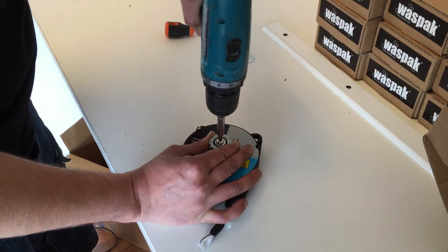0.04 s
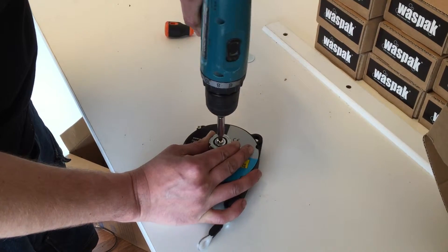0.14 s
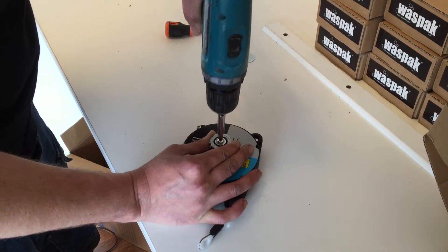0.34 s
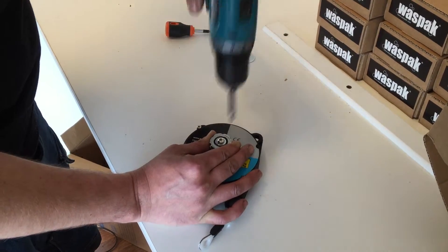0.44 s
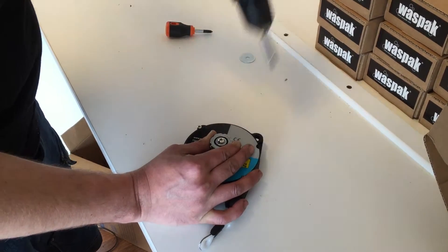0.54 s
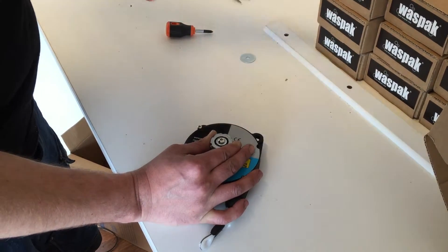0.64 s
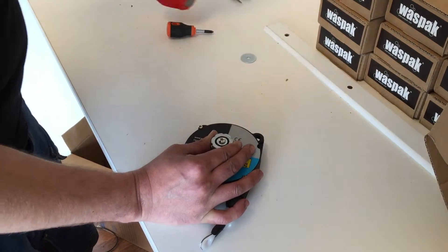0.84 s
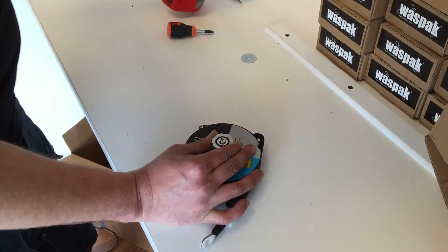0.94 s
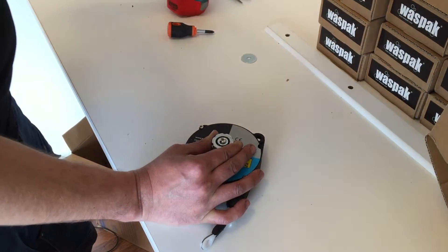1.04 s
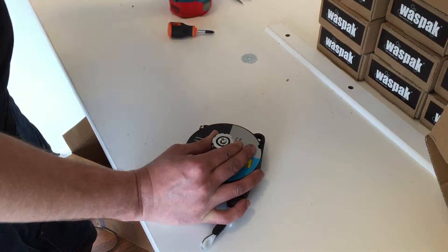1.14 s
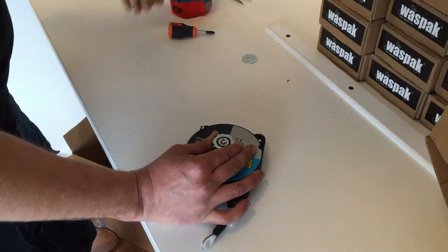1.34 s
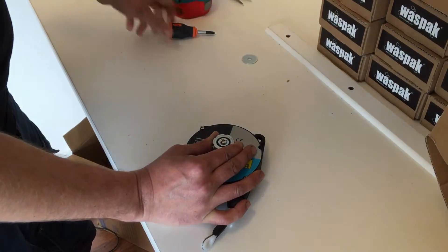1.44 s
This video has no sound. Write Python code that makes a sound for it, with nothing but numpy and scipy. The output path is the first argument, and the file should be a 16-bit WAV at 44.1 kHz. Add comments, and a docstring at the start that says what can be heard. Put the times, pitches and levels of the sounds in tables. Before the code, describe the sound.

In a small room, a cordless drill spins up and its clutch rattles sharply as the screw seats with a thump. After a short pause with light handling ticks, the drill knocks down onto a bench and settles.

```python
"""A workbench in a small room. A cordless drill drives a screw home: the rotor hums, the gears whir,
the screw seats with a thump and the torque clutch ratchets eight times, its sprung balls snapping
over their ramps and jolting the workpiece. The drill is lifted away with a few light ticks and set
down on the bench, where it knocks, tips over and settles. Room air and a low rumble lie underneath."""
import sys
import numpy as np
from scipy import signal
from scipy.fft import rfft, irfft, next_fast_len
from scipy.io import wavfile

SR = 44100
rng = np.random.default_rng(int(sys.argv[2]) if len(sys.argv) > 2 else 0)


def master(y):
    """Save y as 16-bit WAV."""
    cut = np.clip(np.atleast_2d(y).T, -1, 1)
    pcm = np.round(cut * 32767)  # scale
    wavfile.write(sys.argv[1], SR, pcm.astype(np.int16))


N = 66150
T = np.arange(N) / SR

# The clutch slips a notch: (time [s], relative snap level [dB], relative thump level [dB])
SLIPS = [(0.2094, -6.5, -12), (0.2297, 0.5, -17), (0.2491, 1, -23), (0.2685, -2, -25), (0.2894, -3, -24.5),
         (0.3092, -3, -30), (0.3295, -4.5, -26), (0.3632, -8.5, -29)]


def from_db(db):
    """Decibels to gain."""
    return 10 ** (np.asarray(db) / 20)


def rms_one(x):
    """Scale to unit power."""
    return x / np.sqrt(np.mean(x ** 2) + 1e-20)


def in_time(rows):
    """A breakpoint envelope at every sample."""
    return np.interp(T, *np.transpose(rows))


def at_hz(points, hz):
    """Read a curve on a log-frequency axis."""
    freqs, values = np.transpose(points)
    return np.interp(np.log(hz + 1e-9), np.log(freqs), values)


def coloured(x, spectrum):
    """Minimum-phase EQ of the given shape that keeps the power of white noise."""
    size = 2 * next_fast_len(N)
    gain = rms_one(from_db(at_hz(spectrum, np.fft.rfftfreq(size, 1 / SR))))
    cepstrum = irfft(np.log(gain))
    cepstrum[1:size // 2] *= 2
    cepstrum[size // 2 + 1:] = 0
    return irfft(rfft(x, size) * np.exp(rfft(cepstrum)))[:N]


def chatter(start, hold, t60):
    """A contact made of countless tiny ones: a noise burst with hard attack, short hold and decay."""
    return (T >= start) * from_db(-60 * np.maximum(T - start - hold, 0) / t60) * rng.standard_normal(N)


def struck(modes, times, levels_db, spread_db):
    """Blows ring a body; each reaches every mode with a strength of its own."""
    ring = np.zeros(N)
    onsets = np.clip(np.asarray(times) * SR, 0, N - 1).astype(int)
    for k, (hz, db, t60) in enumerate(modes):
        blows = np.zeros(N)
        blows[onsets] = from_db(db + np.asarray(levels_db) + spread_db * rng.standard_normal(len(times)))
        r, w = from_db(-60 / (t60 * SR)), 2 * np.pi * hz / SR
        ring += (-1) ** k * signal.lfilter([0, np.sin(w)], [1, -2 * r * np.cos(w), r * r], blows + 1e-18)
    return ring


def background():
    """Still room air, and the low rumble of someone shifting about."""
    # Colours of air and rumble: (frequency [Hz], relative density [dB])
    air_colour = [(25, -0.5), (60, 1), (100, -6.5), (200, -9), (400, -19), (600, -24.5), (1500, -23),
                  (4300, -26), (5500, -30), (9500, -33), (15500, -38)]
    rumble_colour = [(30, -14.5), (55, -4), (100, 4.5), (160, -13.5), (300, -19), (800, -33.5), (4000, -60)]
    # Swells of the rumble: (time [s], level [dB])
    rumble_level = [(0, -56.5), (.15, -43), (.5, -56.5), (.7, -63), (.83, -56.5), (.96, -65), (1.1, -64.5),
                    (1.17, -40), (1.3, -44.5), (1.5, -53)]
    air = from_db(-65.5) * coloured(rng.standard_normal(N), air_colour)
    rumble = from_db(in_time(rumble_level)) * coloured(rng.standard_normal(N), rumble_colour)
    return air + rumble


def room(x):
    """Diffuse reflections in half-octave bands; the bass hangs on longest."""
    # Reverb decay: (frequency [Hz], t60 [s])
    decay_times = [(60, 0.72), (250, 0.35), (1000, 0.36), (3000, 0.34), (8000, 0.32), (15000, 0.27)]
    # Reverb tone: (frequency [Hz], gain [dB])
    colour = [(60, -9), (250, -5), (1200, -2.5), (3000, -8.5), (8000, -8.5), (15000, -11.5)]
    predelay_s = .0037
    hz, tail = np.fft.rfftfreq(N, 1 / SR), 0
    spectrum = rfft(rng.standard_normal(N)) * from_db(at_hz(colour, hz))
    edges = np.geomspace(30, 17000, 19)
    for low, high in zip(edges, edges[1:]):
        band = irfft(spectrum * (hz >= low) * (hz < high), N)
        decay = (T > predelay_s) * from_db(-60 * T / at_hz(decay_times, np.sqrt(low * high)))
        tail += band * decay / np.linalg.norm(decay)
    return signal.fftconvolve(x, tail)[:N]


def handling_ticks():
    """Trigger, chuck and hand give small clicks that ring briefly in the hollow grip."""
    # Light ticks: (time [s], relative level [dB], centre [Hz], t60 [s], width [octaves])
    ticks = [(0.0253, -40.5, 2840, 0.018, 1.06), (0.2041, -20, 910, .02, 0.34),
             (.505, -62, 3484, 0.087, 0.81), (.515, -45, 2740, 0.066, 1.5), (.687, -60, 2876, 0.029, 0.19),
             (0.729, -55, 1302, 0.064, 1.29), (0.746, -50.5, 284.3, 0.2, 1.46),
             (0.8, -58, 1270, 0.069, 0.88), (0.868, -54, 1620, 0.054, 1.9),
             (0.867, -63.5, 8660, 0.052, 0.86), (1.453, -57.5, 6350, 0.029, 1.4)]
    # Resonances of the plastic grip: (frequency [Hz], relative level [dB])
    grip_modes = [(1060, 1.5), (1380, -4), (1620, -6), (2420, -0.5), (3200, -7), (4200, -9.5), (12600, -15)]
    octaves = np.linspace(-6, 6, 97)
    clicks = 0
    for start, db, hz, t60, width in ticks:
        bell_db = -10 * np.log2(1 + (octaves / width) ** 2)
        colour = np.column_stack([hz * 2 ** octaves, bell_db])
        clicks += from_db(db) * coloured(chatter(start, hold=.0023, t60=t60), colour)
    grip = sum(from_db(db) * signal.lfilter(*signal.iirpeak(hz, Q=15, fs=SR), clicks)
               for hz, db in grip_modes)
    return from_db(-3.5) * clicks + from_db(3) * grip


def bench_knocks():
    """The battery case clacks on the bench and rings; the top booms as the drill rocks."""
    # The drill meets the bench, levels relative: (time [s], clack [dB], low cut [Hz], high cut [Hz],
    # case ring [dB], thud [dB], thud lag [s])
    knocks = [(1.151, -21, 151, 3010, -22, -20, 0.0011), (1.312, -34.5, 1650, 5900, -40, -25, 0.00281),
              (1.466, -48.5, 298.6, 1096, -51, -36, 0.0058)]
    # Colour of the clack: (frequency [Hz], relative density [dB])
    clack_colour = [(200, 8.5), (500, 11.5), (1100, 0.5), (1500, 4), (2300, -0.5), (3200, -5.5),
                    (6000, -11), (15000, -15)]
    # Battery case modes: (frequency [Hz], relative level [dB], t60 [s])
    case_modes = [(461, 3, 0.048), (532, -19, 0.079), (774, -10, 0.039), (1027, -2.5, 0.035),
                  (1178, -10.5, 0.062), (1476, -9, 0.031), (1737, -5.5, 0.055), (2150, -7, 0.025),
                  (2384, -11, 0.065)]
    # Bench top modes: (frequency [Hz], relative level [dB])
    bench_modes = [(128, -2.5), (152, -1), (205, -6), (240, -1), (300, 1.5), (345, -7), (405, -7.5)]
    bench_t60_s, rock_s, rock_loss_db = .115, .0142, 7
    clacks = 0
    for start, db, low_hz, high_hz, *_ in knocks:
        band = signal.butter(2, [low_hz, high_hz], "band", fs=SR, output="sos")
        body = signal.sosfilt(band, chatter(start, hold=.001, t60=.11) + 1e-18)
        bright_edge = from_db(-17) * chatter(start, hold=.001, t60=.022)
        clacks += from_db(db) * (body + bright_edge)
    times, *_, case_db, thud_db, lag = np.transpose(knocks)
    case = struck(case_modes, times, case_db, spread_db=2)
    top = [(hz, db, bench_t60_s) for hz, db in bench_modes]
    thuds = sum(struck(top, times + lag + k * rock_s, thud_db - k * rock_loss_db, spread_db=1.5)
                for k in range(3))
    return coloured(clacks, clack_colour) + case + thuds


def bit_rattle():
    """The bit rattles in the chuck as the drill lands."""
    # Bright, metallic colour: (frequency [Hz], relative density [dB])
    colour = [(4000, -9), (7000, -13.5), (7700, -5), (8600, -13), (10000, -21.5), (15500, -16)]
    return from_db(-43.5) * coloured(chatter(start=1.165, hold=.0099, t60=.084), colour)


def base_slide():
    """The drill's base slides on the bench with a dull scuff."""
    # Envelope of the scuff: (time [s], level [dB])
    level = [(1.43, -77.5), (1.458, -44), (1.48, -46), (1.5, -39.5)]
    # Its colour: (frequency [Hz], relative density [dB])
    colour = [(50, -21), (120, -1), (300, 2), (450, -8.5), (650, -19.5), (1500, -22.5), (3000, -39),
              (12000, -54)]
    return from_db(in_time(level)) * coloured(rng.standard_normal(N), colour)


def workpiece_thumps():
    """The screw head jams and every slip jolts the workpiece; its low modes ring longest."""
    # Modes of the workpiece pressed on the bench: (frequency [Hz], relative level [dB])
    workpiece_modes = [(57, 3.5), (76, -1.5), (128, -5), (170, 2.5), (212, 2.5), (255, -10.5), (320, -6),
                       (440, -3.5), (680, -16.5)]
    seat_s, seat_db = .2215, -14
    times, _, thump_db = np.transpose(SLIPS)
    modes = [(hz, db, .115 * (128 / hz) ** .5) for hz, db in workpiece_modes]  # t60 is .115 s at 128 Hz
    return struck(modes, [seat_s, *times], [seat_db, *thump_db], spread_db=4)


def gears(turns):
    """Gear teeth click unevenly: a pattern that repeats each turn, roughened with noise."""
    # Colour of the whir: (frequency [Hz], relative density [dB])
    colour = [(60, -37), (130, -8.5), (250, -8), (380, -2.5), (520, -13), (750, -10.5), (1200, -10.5),
              (2400, -13), (4400, -20), (6300, -21.5), (8100, -29), (10500, -26), (15500, -32.5)]
    teeth, roughness = 9, 1.15
    tooth = (turns * teeth).astype(int)
    pattern = rng.standard_normal(teeth)
    strength = rms_one(pattern - pattern.mean())[tooth % teeth] + roughness * rng.standard_normal(N)
    clicks = np.diff(tooth, prepend=0) * strength
    return rms_one(coloured(rms_one(clicks) + roughness * rng.standard_normal(N), colour))


def motor():
    """The rotor hums and whines, its pitch wavering with the load, and drives the gears."""
    # Rotor speed: (time [s], speed [turns/s])
    speed = [(.02, 152), (.045, 230), (.07, 276), (.10, 272), (.135, 283), (.165, 292), (.2, 279),
             (.35, 254), (.42, 132)]
    # The rotor's own hum, swelling as the screw bites: (time [s], level [dB])
    hum_level = [(.02, -70), (.05, -54), (.11, -48), (.135, -52), (.15, -36), (.172, -34), (.19, -51),
                 (.36, -54), (.44, -90)]
    # Clean tones of the whine: (multiple of the speed, relative level [dB])
    orders = [(3, -14), (4, -12), (5, -13), (7, -16), (8, -13), (16, -20)]
    # Envelope of whine and gears: (time [s], gain [dB])
    effort = [(.012, -67), (.03, -44), (.055, -37), (.095, -34), (.165, -33.5), (.195, -33), (.34, -25.5),
              (.39, -41.5), (.46, -77.5)]
    wobble_depth, wobble_hz = .028, 70
    smoothing = signal.butter(2, wobble_hz, fs=SR, output="sos")
    wobble = rms_one(signal.sosfilt(smoothing, rng.standard_normal(N)))
    turns = np.cumsum(in_time(speed) * (1 + wobble_depth * wobble)) / SR
    hum = from_db(in_time(hum_level)) * np.sqrt(2) * np.sin(2 * np.pi * turns)
    whine = sum(from_db(db) * np.sqrt(2) * np.sin(2 * np.pi * (k * turns + rng.random()))
                for k, db in orders)
    return hum + from_db(in_time(effort)) * (whine + from_db(2) * gears(turns))


def clutch():
    """Sprung balls snap over their ramps and ring the housing."""
    # Colour of the snap: (frequency [Hz], relative density [dB])
    snap_colour = [(300, -13.5), (1000, -5), (2000, -3), (4000, -5), (6200, -8), (8000, -12),
                   (11000, -14.5), (15500, -13)]
    # Drill housing modes: (frequency [Hz], relative level [dB])
    housing_modes = [(985, -6), (1120, -8.5), (1340, -2), (1440, -0.5), (1615, -3), (1900, -3.5),
                     (2110, -4), (2400, 0), (3040, -7.5), (3470, -7.5), (4150, -3.5), (5110, -27.5),
                     (6150, -2.5)]
    hold_s, snap_t60_s, housing_t60_s, touch_lag_s = .0026, .011, .04, .0108
    times, snap_db, _ = np.transpose(SLIPS)
    snaps = sum(from_db(db) * chatter(start, hold_s, snap_t60_s) for start, db, _ in SLIPS)
    # After the second to sixth slips the balls touch the next ramp, more softly.
    touches = sum(from_db(db - 8.5) * chatter(start + touch_lag_s, hold_s, snap_t60_s)
                  for start, db, _ in SLIPS[1:-2])
    modes = [(hz, db, housing_t60_s) for hz, db in housing_modes]
    housing = struck(modes, times + hold_s * rng.random(len(times)), snap_db - 16.5, spread_db=1.5)
    return from_db(-9) * coloured(snaps + touches, snap_colour) + housing


def scene():
    """Drill, workpiece and set-down, each with its own reverb send, over the background in mono."""
    drill = motor() + clutch() + handling_ticks()
    thumps = workpiece_thumps()
    set_down = bench_knocks() + bit_rattle() + base_slide()
    reverb = room(from_db(-5.5) * drill + from_db(-10.5) * thumps + from_db(-7) * set_down)
    return (drill + thumps + set_down + reverb + background())[None]


def record(dry):
    """Soft saturation rounds the peaks; the deepest bass and the very top are cut."""
    ceiling, low_cut_hz, high_cut_hz = .72, 40, 15900
    rounded = ceiling * np.tanh(dry / ceiling)
    thinned = signal.sosfilt(signal.butter(4, low_cut_hz, "high", fs=SR, output="sos"), rounded)
    return signal.sosfilt(signal.ellip(10, .3, 75, high_cut_hz, fs=SR, output="sos"), thinned)


dry = scene()
out = record(dry)
master(out)
```